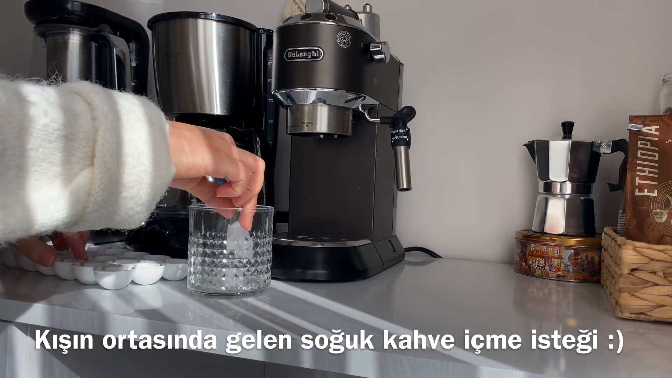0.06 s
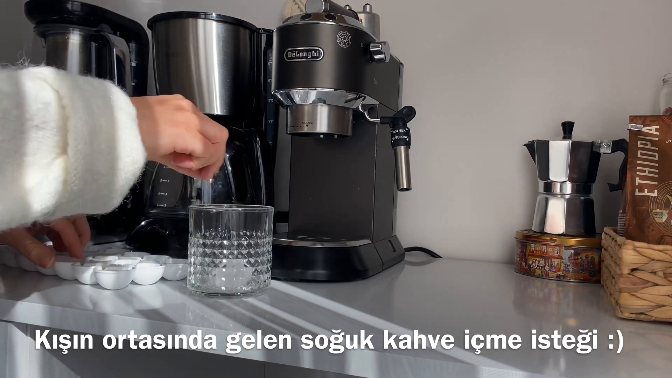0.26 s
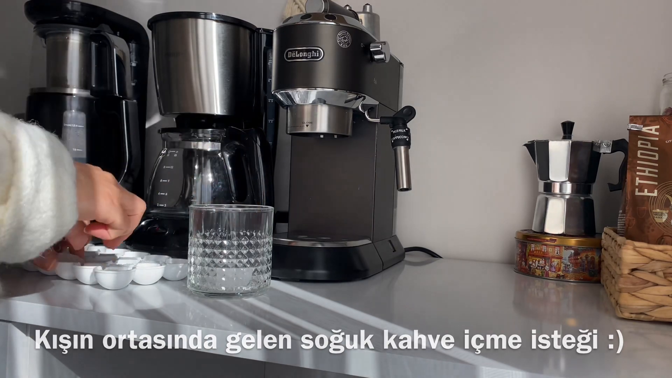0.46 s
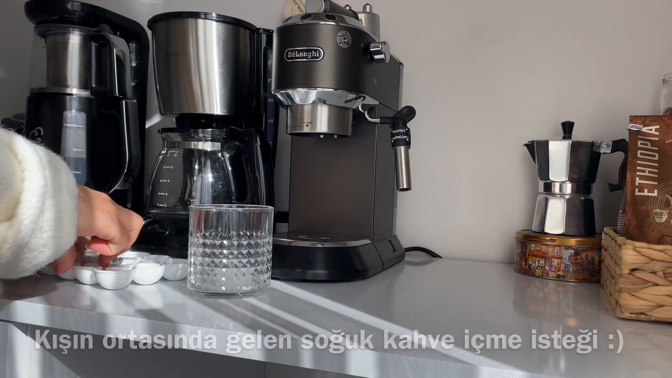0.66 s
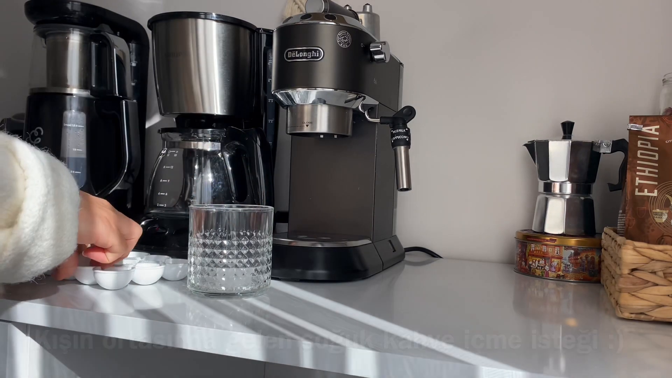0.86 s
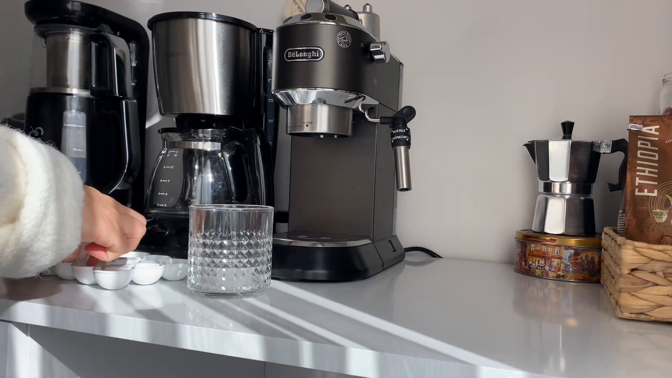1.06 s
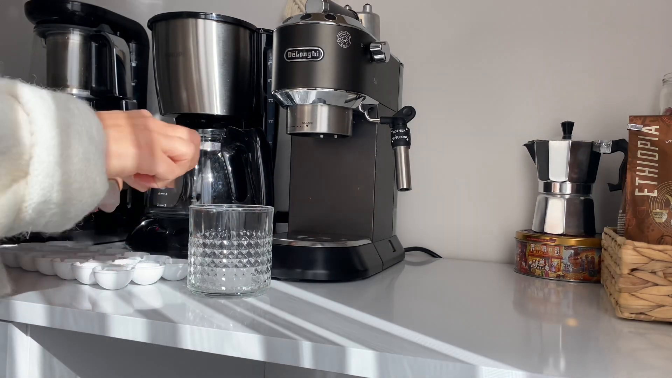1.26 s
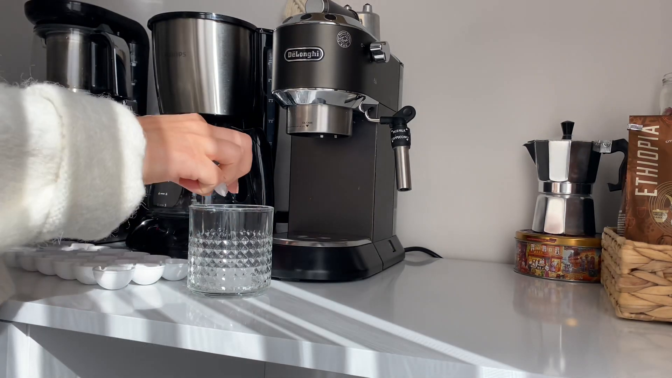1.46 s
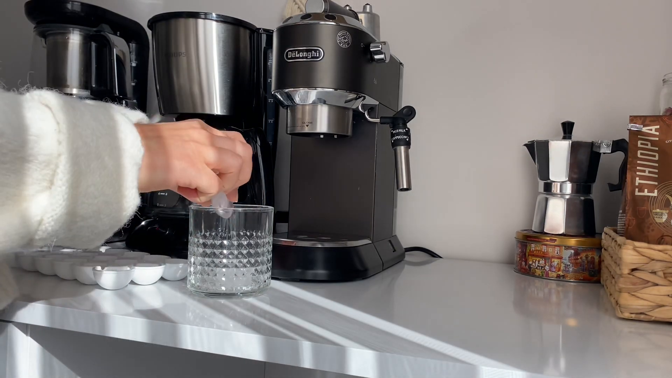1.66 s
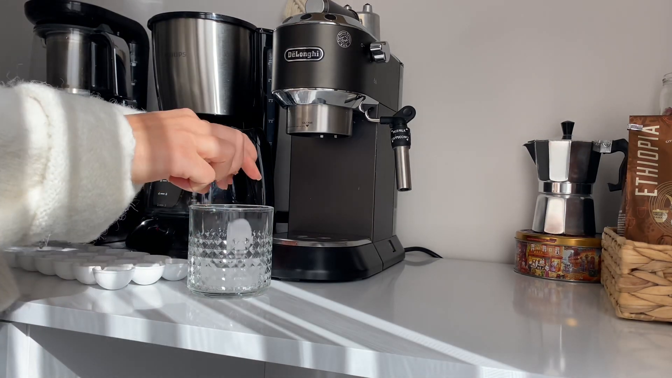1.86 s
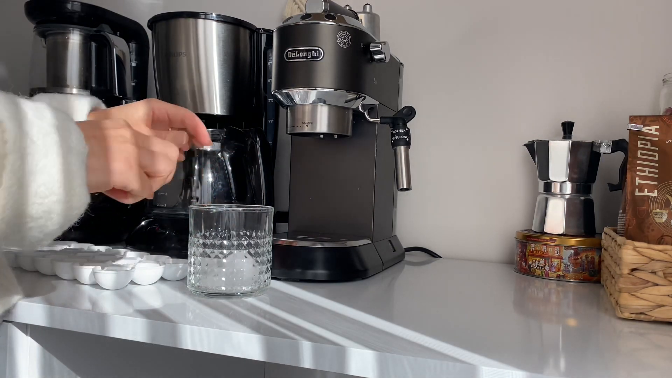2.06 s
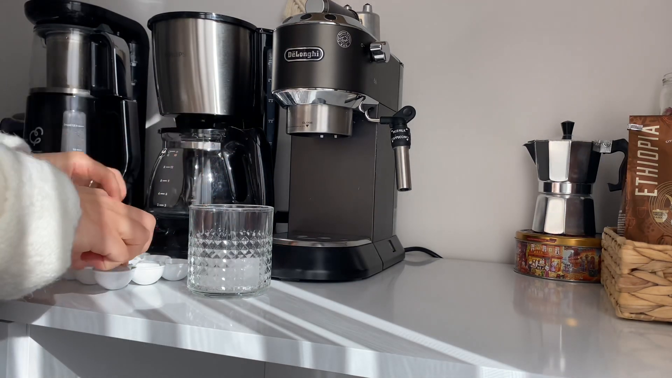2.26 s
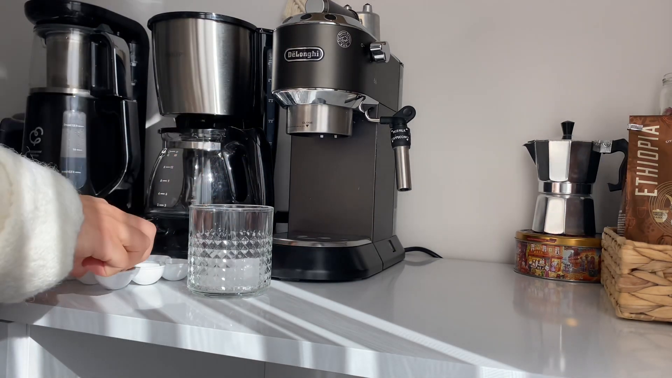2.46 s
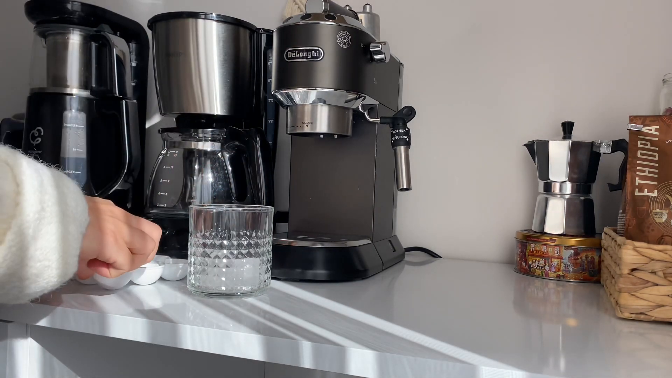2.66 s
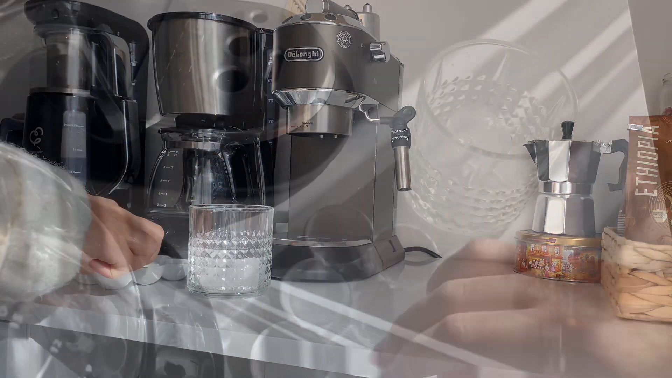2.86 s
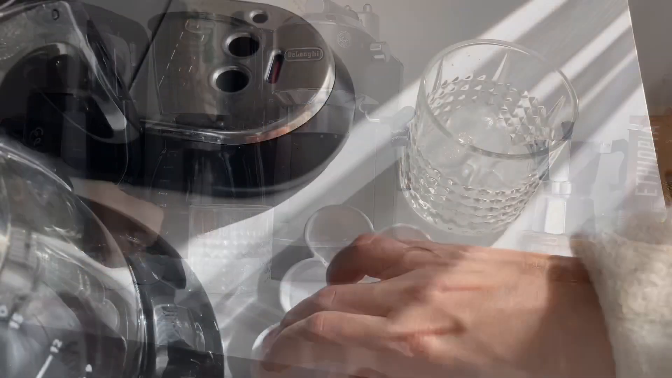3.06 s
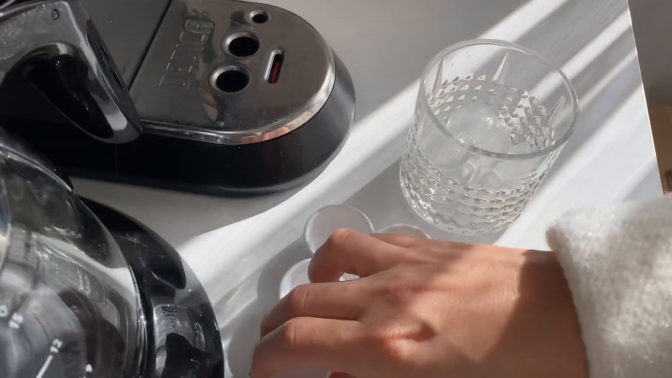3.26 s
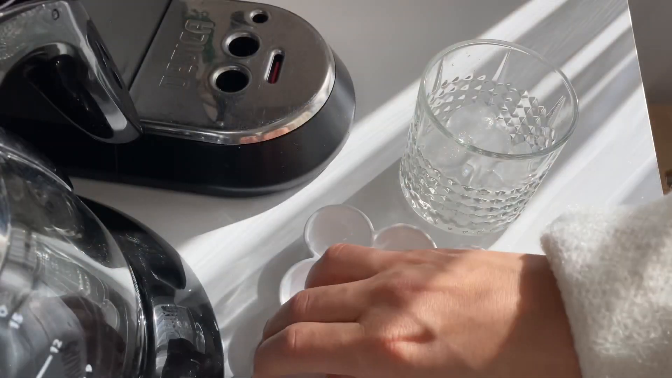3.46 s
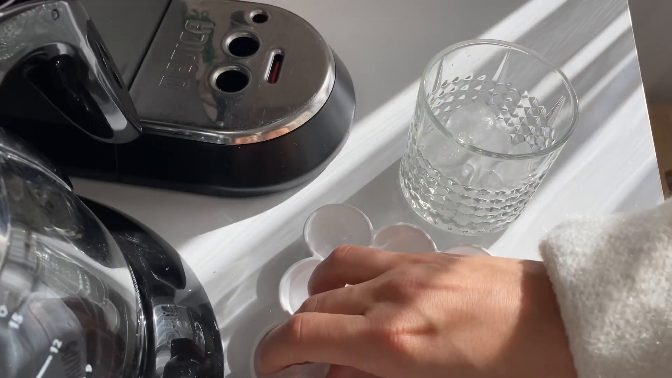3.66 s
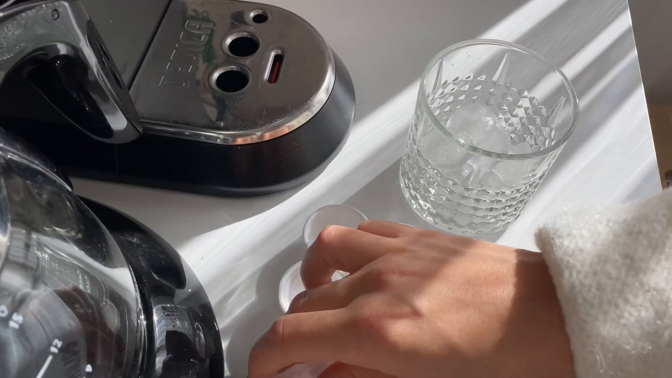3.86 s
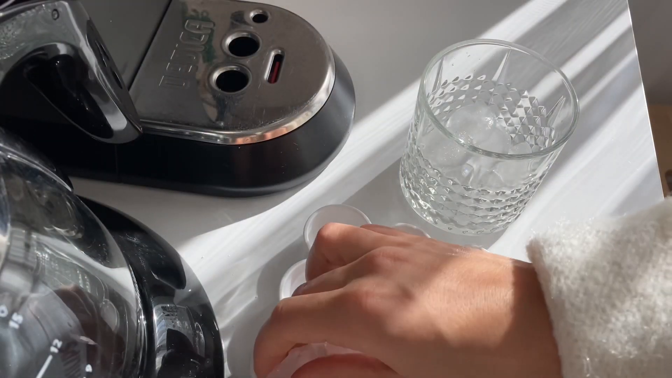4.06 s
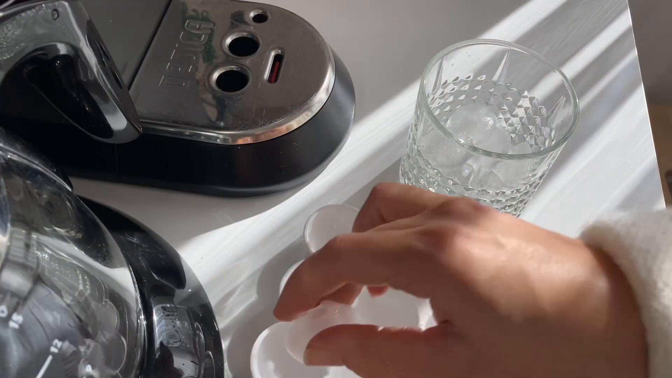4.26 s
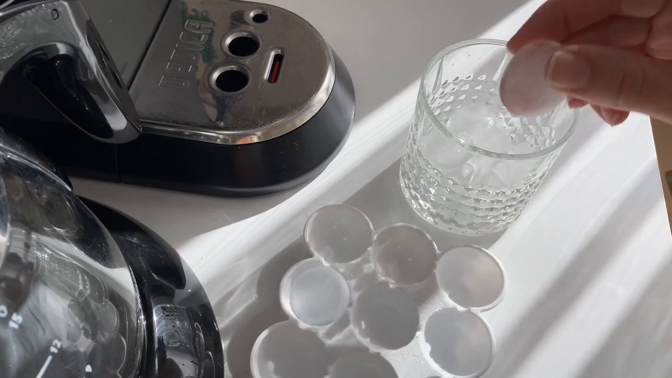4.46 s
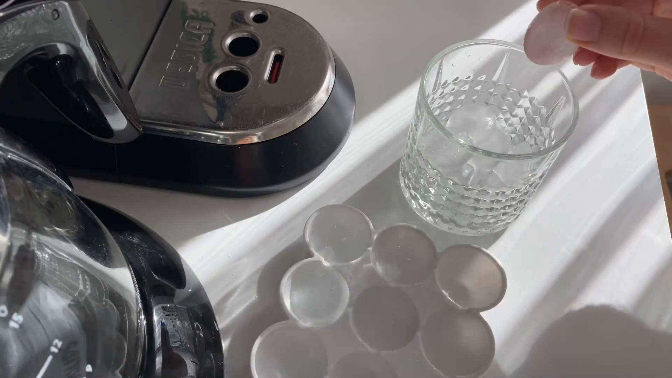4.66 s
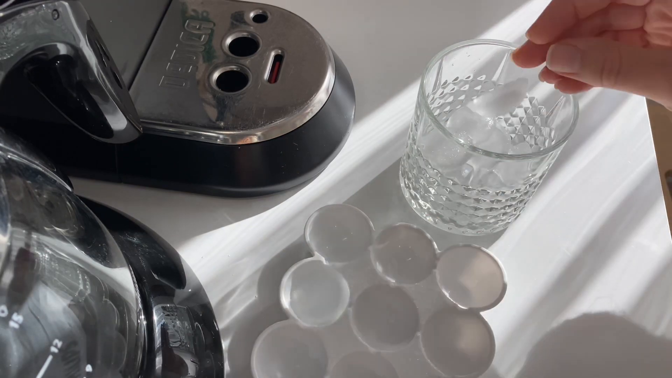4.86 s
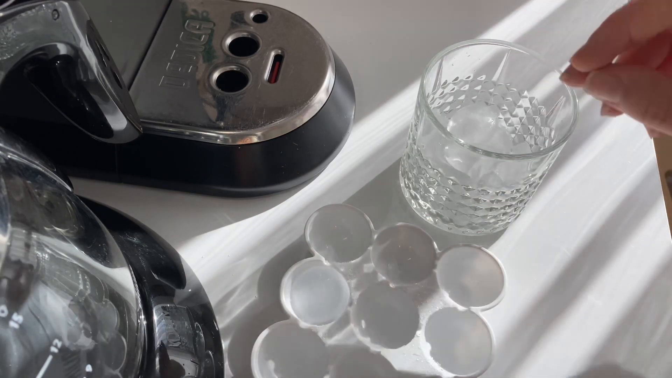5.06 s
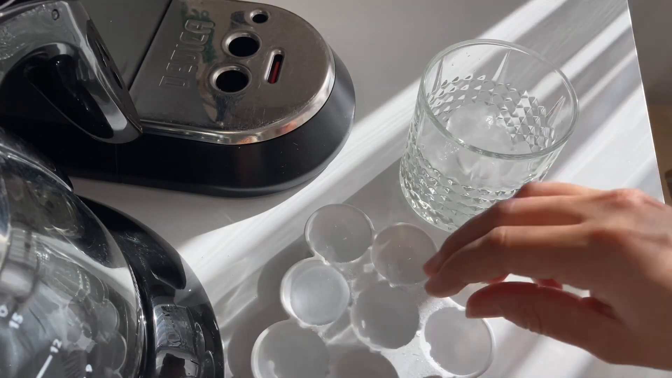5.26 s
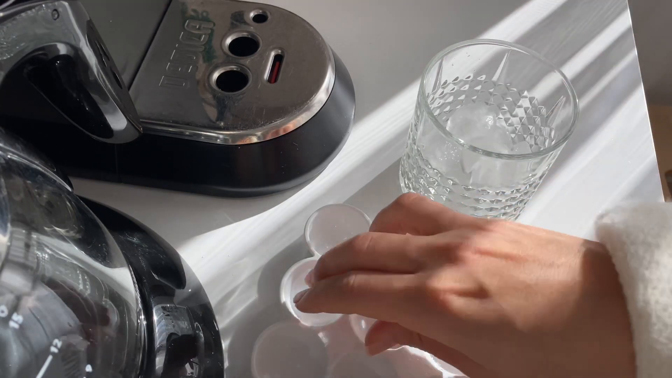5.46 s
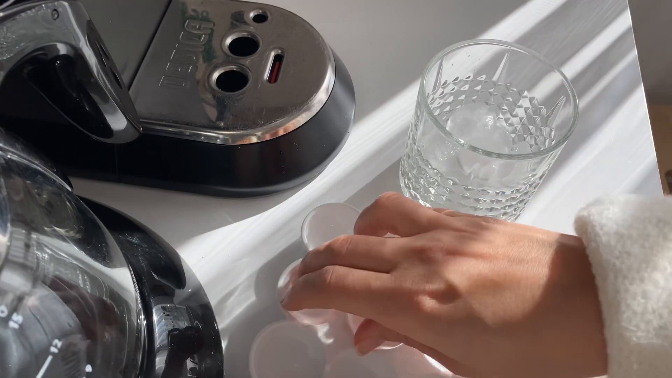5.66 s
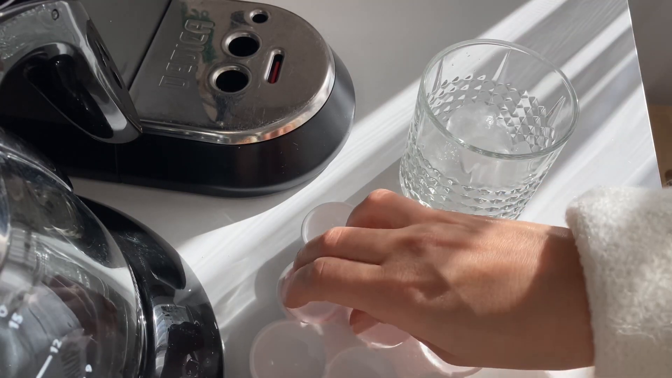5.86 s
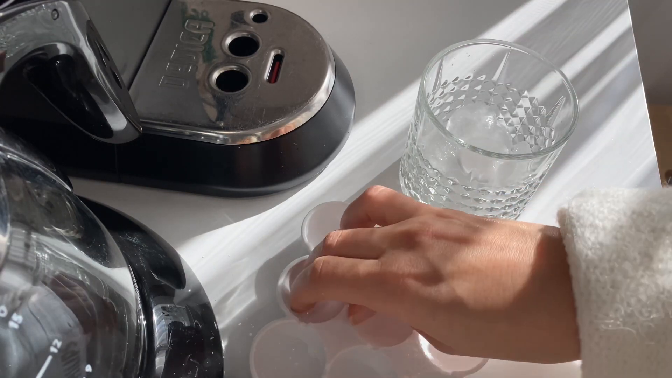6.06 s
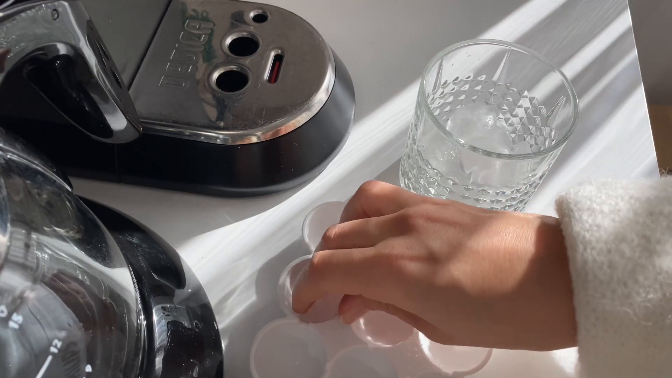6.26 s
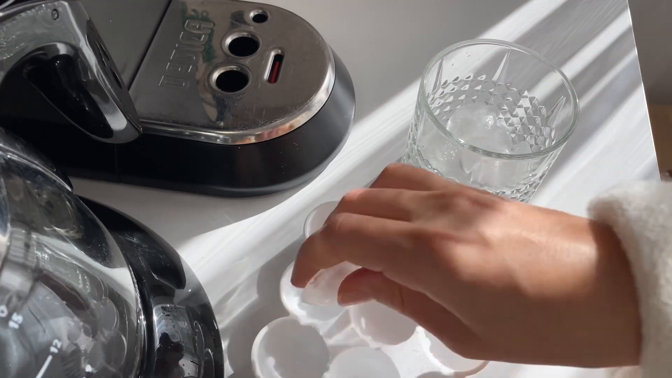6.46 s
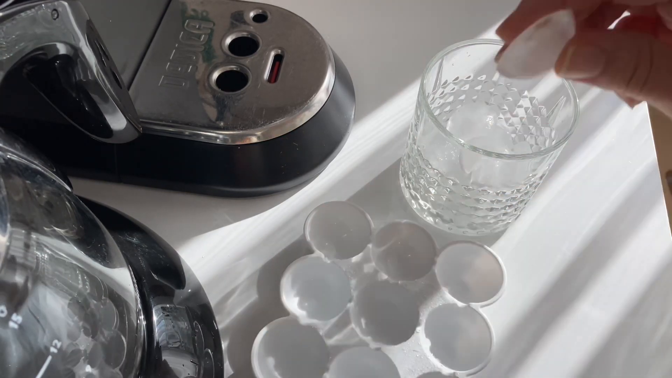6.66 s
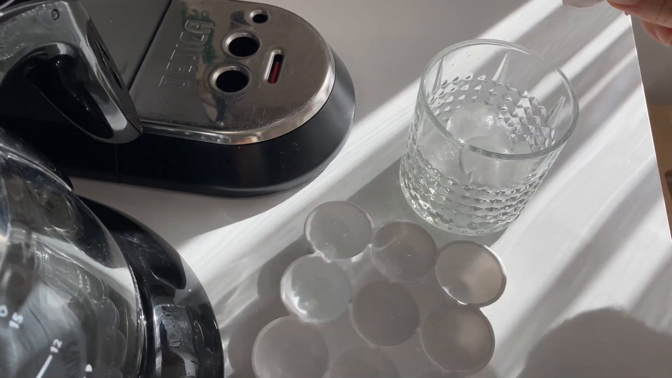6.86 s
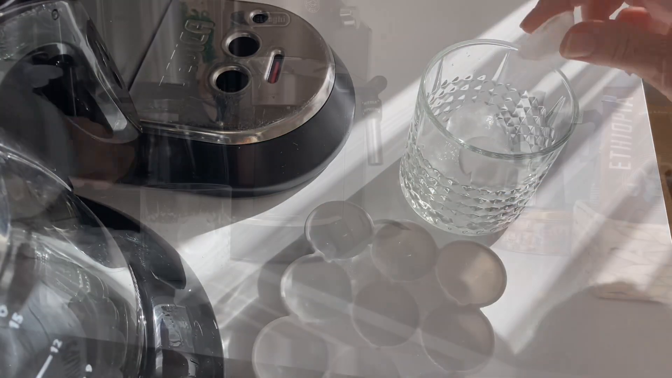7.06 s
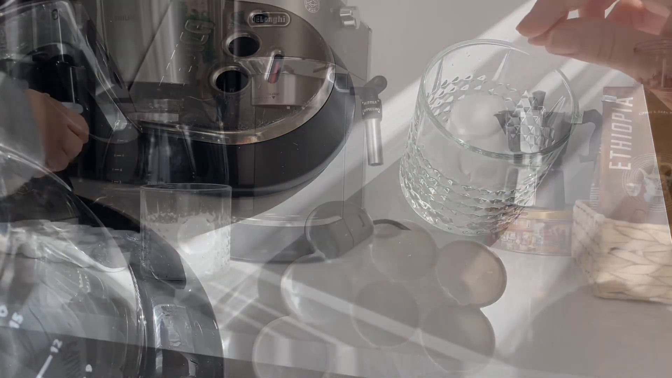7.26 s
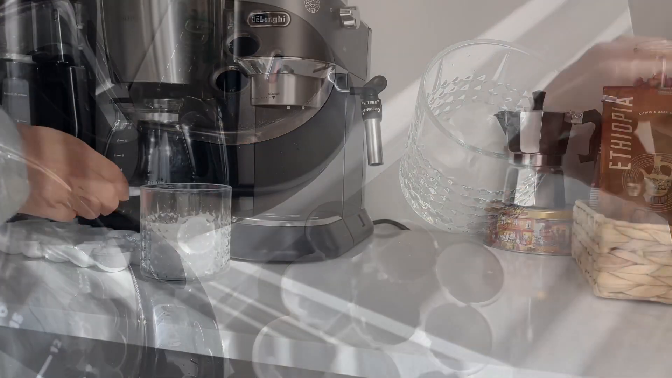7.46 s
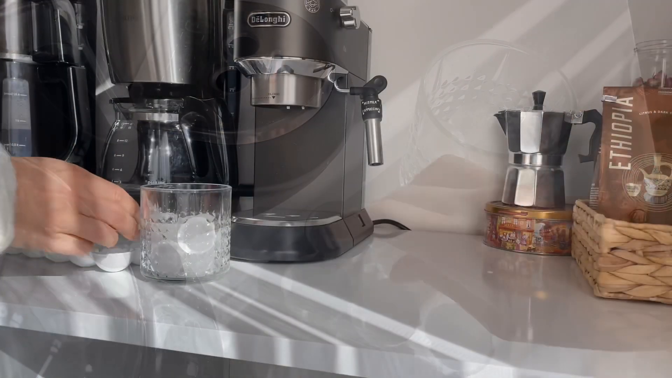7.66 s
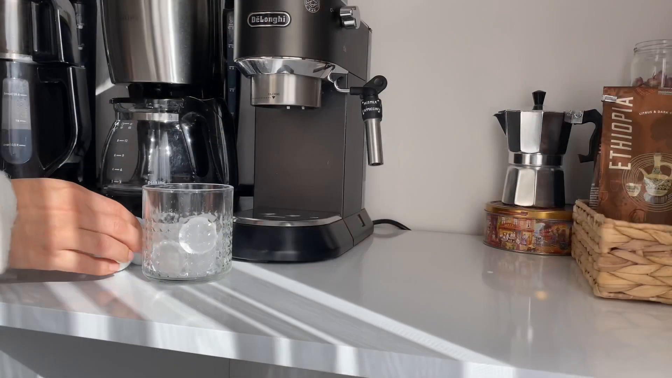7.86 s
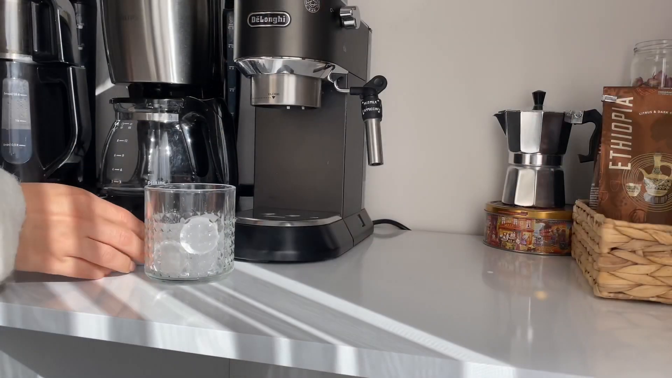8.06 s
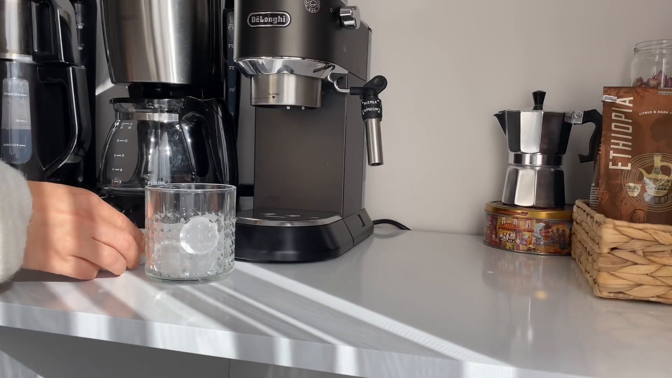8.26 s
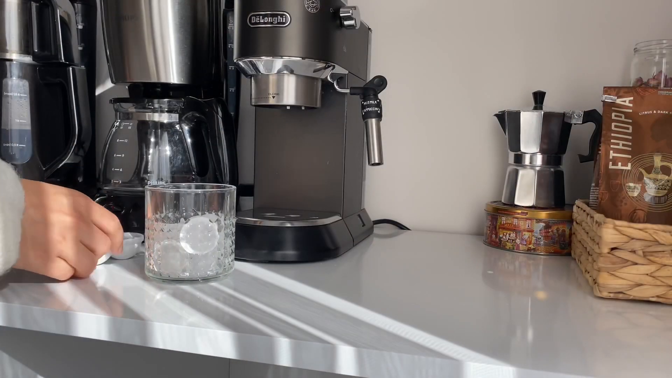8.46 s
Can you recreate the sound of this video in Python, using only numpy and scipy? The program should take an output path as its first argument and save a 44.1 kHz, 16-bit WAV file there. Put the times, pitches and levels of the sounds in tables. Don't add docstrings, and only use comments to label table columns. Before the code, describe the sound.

Ice cubes are pressed from a thin plastic tray and dropped into a thick glass on a counter. Two reverberant clinks are heard from across the room, the second a ringing cluster with a counter thud. Close up, sharp plastic snaps and gritty rubbing alternate with crisp, dry ice drops and a faint cloth brush. The distant view returns with hollow tray crackles over soft room rumble.

```python
import sys
import numpy as np
from scipy import signal
from scipy.fft import rfft, irfft
from scipy.io import wavfile

SR = 44100
rng = np.random.default_rng(int(sys.argv[2]) if len(sys.argv) > 2 else 0)


def put_to_file(sound):
    columns = np.atleast_2d(sound).T
    safe = np.clip(columns, -1, 1)
    whole_steps = np.round(safe * 32767)
    wavfile.write(sys.argv[1], SR, whole_steps.astype(np.int16))


def magnitude_from_level(level_db):
    exponent = np.asarray(level_db, float) / 20
    return 10 ** exponent


N = 375732
HZ = np.maximum(np.fft.rfftfreq(2 ** 19, 1 / SR), 1)

# [t/s, room level/dB, tumbler left over right/dB, upper counter modes level/dB]
DISTANCE = [
    (0.0, 2, 0.8, -2.5),
    (2.7, -1, -0.2, -2),
    (3.1, -12.5, 1, -8),
    (7.5, -12, 0, -18.5),
    (7.8, -1.5, 13, 0.5),
    (8.6, -3, 1, -2.8),
]
# [start t/s, end t/s]
CLOSE_SPAN = (3.0, 7.7)


def at_hz(points, hz):
    points = np.array(points)
    return np.interp(np.log(hz), np.log(points[:, 0] + 1), points[:, 1])


def at_s(rows, s, column):
    rows = np.array(rows)
    return np.interp(s, rows[:, 0], rows[:, column])


def is_close(s):
    return CLOSE_SPAN[0] < s < CLOSE_SPAN[1]


def through(x, response):
    return irfft(rfft(x, 2 ** 19) * response)[..., :N]


def colour(spectrum):
    cepstrum = irfft(at_hz(spectrum, HZ[::128]) * np.log(10) / 20)
    cepstrum[1:2048] *= 2
    cepstrum[2049:] = 0
    pulse = irfft(np.exp(rfft(cepstrum)))
    return rfft(pulse / np.linalg.norm(pulse), 2 ** 19)


def lowpass(x, order, hz):
    return signal.sosfilt(signal.butter(order, hz, fs=SR, output="sos"), x)


def resonances(x, peaks):
    out = 0
    for k, (hz, width, db) in enumerate(peaks):
        r = np.exp(-np.pi * max(width, 5) / SR)
        a = [1, -2 * r * np.cos(2 * np.pi * hz / SR), r * r]
        b = [(1 - r * r) / 2, 0, (r * r - 1) / 2]
        out = out + (-1) ** k * magnitude_from_level(db) * signal.lfilter(b, a, x + 1e-18)
    return out


def add(track, s, sound):
    i = round(s * SR)
    track[..., i:i + sound.shape[-1]] += sound[..., :N - i]


def dying(t60, rise=0.00011):
    t = np.arange(int(.8 * SR)) / SR
    return (1 - np.exp(-t / max(rise, 1e-5))) * magnitude_from_level(-60 * t / max(t60, .002))


def sides(pan_db):
    return magnitude_from_level(np.array([pan_db / 2, -pan_db / 2]))


def stroke(t, start, length):
    u = (t - start) / length
    peak, edge_db = 0.31, -18
    on = np.clip(np.minimum(u, 1 - u) * length / 0.016, 0, 1)
    away = np.maximum(1 - u / peak, (u - peak) / (1 - peak))
    return on * magnitude_from_level(edge_db * np.clip(away, 0, 1))


def uneven_grains(per_s, uneven_db, floor):
    strength = magnitude_from_level(uneven_db * np.minimum(rng.exponential(1, N), 5))
    return strength * (rng.random(N) < per_s / SR) + floor


def struck(modes, levels_db, chance, rise):
    t = np.arange(int(.8 * SR)) / SR
    return sum(magnitude_from_level(db + 2 * z) * dying(t60, rise) * np.sin(2 * np.pi * hz * t + 2 * z)
               for (hz, t60), db, z in zip(modes, levels_db, chance))


def tumbler():
    # [t/s, crack peak level/dB, counter thud level/dB, ring level/dB, sharpness/dB per family]
    far_clinks = [(0.1005, -44, -35.5, -60.5, -1), (0.1115, -5, -23, -39, -13), (0.2838, -34, -43, -58, -3),
                  (0.4174, -29.5, -56.5, -47, -4.5), (1.6937, -33, -39.5, -40, -4),
                  (1.7664, -5.5, -18.5, -50.5, -9.5), (1.806, -15.5, -32.5, -42, -4),
                  (1.8344, -14.5, -44, -37, 13.5), (1.8467, -8, -39, -19, 11),
                  (1.8911, -11, -34.5, -21.5, 5.5), (1.9084, -0.5, -25.5, -19.5, 7),
                  (1.9324, -11.5, -34.5, -20.5, 7), (1.9613, -22, -36, -48.5, 5.5),
                  (1.9774, -24.5, -32, -33.5, -9), (2.156, -10, -33.5, -25.5, 3.5)]
    near_clinks = [(4.9101, -15.5, -21, -33.5, -7.5), (4.9409, -3, -23.5, -39, -4.5),
                   (4.965, -25, -24, -35.5, -6), (5.015, -12, -32, -46, -14),
                   (5.111, -53, -32.5, -53.5, -16.5), (5.131, -27, -33.5, -60, -3),
                   (5.1391, -23, -41, -25, 1.5), (5.22, -49, -43, -58, -10), (7.2648, -7.5, -32, -33.5, 20),
                   (7.2811, -10, -30, -34.5, -3), (7.3399, -15, -31, -24.5, -1.5),
                   (7.346, -15, -34.5, -23.5, 6.5), (7.3738, -15, -52.5, -16, 5.5),
                   (7.538, -45, -47, -50.5, -8.5), (7.5642, -33.5, -62.5, -49.5, -10.5),
                   (7.572, -37.5, -40, -36, -2)]
    # [f/Hz, level/dB per Hz]
    crack_near = [(180, -42), (300, -2.5), (1590, -11), (2120, -7), (2870, -12.5), (3630, -5), (6880, -5),
                  (9160, -7), (11200, -3.5), (15200, -12), (16800, -32)]
    # [f/Hz, level/dB per Hz]
    crack_far = [(180, -27.5), (300, -7), (1100, 0.5), (1600, -7.5), (3340, -12.5), (4830, -9.5),
                 (5620, -5.5), (9320, -15), (11200, -18.5), (13000, -51), (15700, -24.5), (16800, -67.5)]
    near, rasp, far, rings, thuds = np.zeros((5, N))
    hits = far_clinks + near_clinks
    chance, times = rng.standard_normal((len(hits), 29)), np.array(hits)[:, 0]
    for (s, crack_db, thud_db, wall_db, sharp_db), z in zip(hits, chance):
        base_db = thud_db + .5 * at_s(DISTANCE, s, 3)
        if is_close(s):
            base_db -= 15
            add(near, s, magnitude_from_level(crack_db - 1.0) * dying(0.0086))
            add(rasp, s, magnitude_from_level(crack_db - 14) * dying(0.065))
        else:
            add(far, s, magnitude_from_level(crack_db - 9.5) * (dying(0.017, rise=0.00064) + 0.25 * dying(0.064)))
        family_db = [wall_db - sharp_db, wall_db + 3.5, wall_db + sharp_db, base_db]
        add(rings, s, ring(s, times[times > s], crack_db, family_db, z))
        add(thuds, s, thud(s, thud_db, z[15:]))
    tremble = lowpass(rng.standard_normal(N), 2, 45)
    rings *= magnitude_from_level(3.5 * tremble / tremble.std())
    white = rng.standard_normal(N)
    rasp = lowpass(rasp * white, 4, 11000)
    cracks = through(near * white + rasp, colour(crack_near)) + through(far * white, colour(crack_far))
    direct = (rings + thuds + cracks) * sides(at_s(DISTANCE, np.arange(N) / SR, 2))
    return direct, magnitude_from_level(-6.0) * lowpass(rings, 6, 12300) + thuds + lowpass(cracks, 6, 7900)


def ring(s, later_s, crack_db, family_db, chance):
    # [f/Hz, t60/s when empty, family 0 low 1 middle 2 high 3 thick base]
    glass_modes = [(2104, .65, 0), (2117, .4, 0), (2605, .12, 0), (2934, .2, 0), (4878, .36, 1),
                   (4937, .33, 1), (8490, .14, 1), (10840, .17, 2), (10918, .2, 2), (11555, .19, 2),
                   (11590, .17, 2), (13870, .055, 2), (11160, .2, 3), (15300, .13, 3), (15480, .1, 3)]
    ringing_db = [-3, -14.5, -5, -13, -5.5, -2, -9, -6.5, -10.5, -11, -6.5, -5.5, -13.5, -10.5, -15.5]
    # [t/s, share of the empty t60]
    damping = [
        (0.1, 0.9),
        (1.6, 0.72),
        (2.2, 0.76),
        (4.9, 0.95),
        (5.14, 0.29),
        (7.26, 0.19),
        (7.6, 0.18),
    ]
    smother_db = [-4.5, -3.5]
    modes = [(hz, t60 * at_s(damping, s, 1)) for hz, t60, _ in glass_modes]
    lowered_db = np.maximum(crack_db - np.array(family_db) - 23, 0) * [1, 1, 1, 0]
    levels_db = [db + (family_db - lowered_db)[f] for (_, _, f), db in zip(glass_modes, ringing_db)]
    low = struck(modes[:4], levels_db[:4], chance[:4], rise=0.0012)
    rest = struck(modes[4:], levels_db[4:], chance[4:], rise=0.00022)
    t = np.arange(len(low)) / SR + s
    touched = sum(np.clip((t - u) / .002, 0, 1) for u in later_s[:8])
    return low * magnitude_from_level(smother_db[0] * touched) + rest * magnitude_from_level(smother_db[1] * touched)


def thud(s, db, chance):
    # [f/Hz, level/dB, t60/s]
    slab = [(82.7, -8, 0.16), (124.3, -7, 0.25), (158, -6.5, 0.32), (204.5, 0.5, 0.11), (265, -4, 0.064),
            (357.4, -11.5, 0.15), (419.4, -8, 0.19), (491, -12, 0.11), (654, -5, 0.24), (840, -11, 0.051),
            (974.5, 1, 0.21), (980, 0, 0.18), (1167.6, -7, 0.18), (1400, -3.5, .06)]
    upper_db = at_s(DISTANCE, s, 3)
    levels_db = [db - 4.5 + level + (hz > 550) * upper_db for hz, level, _ in slab]
    modes = [(hz, min(t60, 50 / hz)) for hz, _, t60 in slab]
    return struck(modes, levels_db, chance, rise=0.0054)


def rolling():
    # [start t/s, length/s,
    # level/dB]
    rolls = [(0.087, 0.04, -58.5), (0.11, 0.27, -36.5), (1.77, 0.14, -33.5), (1.855, 0.19, -31),
             (2.0, 0.24, -43.5), (2.164, 0.3, -48), (4.894, 0.053, -35.5), (4.908, 0.2, -38),
             (5.03, 0.23, -44), (5.145, 0.2, -49.5), (7.243, 0.046, -57), (7.263, 0.15, -40.5),
             (7.367, 0.6, -59.5)]
    # [f/Hz, level/dB per Hz]
    patter = [(250, -27), (500, -3), (1000, 5.7), (1400, -8), (2600, -7.5), (4500, -12), (7500, -26.5),
              (9200, -25.5), (11500, -25.5), (13000, -41.5)]
    t = np.arange(N) / SR
    press = sum(magnitude_from_level(db) * stroke(t, start, length) for start, length, db in rolls)
    ticks = uneven_grains(per_s=5000, uneven_db=2.0, floor=0.078)
    mid, side = rng.standard_normal((2, N))
    grains = mid + 0.17 * side * [[1], [-1]]
    return through(press * ticks / ticks.std() * grains, colour(patter))


def tray():
    # [f/Hz, width/Hz, level/dB]
    cup_modes = [(628, 540, -10), (824, 260, 0), (1090, 320, 4), (1260, 300, 5), (1530, 340, 4),
                 (2000, 550, 0), (2650, 800, -3), (3550, 1100, -9), (4560, 4600, -20.5)]
    # [f/Hz, level/dB per Hz]
    snap_colour = [(2060, -9), (3500, -6.5), (5500, -12.5), (7850, -12.5), (8950, -16), (10500, -8.5),
                   (13100, -8.5), (15300, -1.5), (16300, -14.5), (16800, -25)]
    # [start t/s, length/s, body level/dB, snap level/dB]
    rubs = [(0.515, 0.34, -65, -50.5), (0.648, 0.3, -50.5, -48.5), (0.896, 0.21, -59, -53.5),
            (2.37, 0.29, -49.5, -65), (2.668, 0.13, -62, -45), (2.847, 0.28, -70, -70),
            (3.304, 0.21, -56, -61), (3.66, 0.2, -38, -58), (3.855, 0.3, -41.5, -47),
            (5.745, 0.43, -70, -58.5), (6.08, 0.17, -56, -71), (6.176, 0.18, -47.5, -47),
            (7.797, 0.25, -56, -62.5), (7.93, 0.32, -34.5, -59), (8.263, 0.4, -47, -58.5)]
    # [t/s, body peak level/dB, snap level/dB, counter thud level/dB, brightness/dB per octave]
    far_pops = [(0.408, -42, -50, -39, 8), (0.527, -57, -57, -61, -4), (0.543, -37.5, -36.5, -28.5, 11),
                (0.618, -39, -62, -60, -4), (0.63, -63, -45.5, -46, 0.1), (0.702, -51, -42.5, -36.5, 4),
                (0.837, -37.5, -42.5, -54, 3.7), (2.418, -67.5, -49, -41, 0.1),
                (2.445, -61, -43.5, -46, 0.1), (2.47, -57, -38.5, -47.5, 3), (2.542, -39, -44, -44, -8.5),
                (2.643, -56, -48, -73, 4), (2.74, -29, -42.5, -45.5, 6), (7.815, -46, -48.5, -42, -14),
                (7.966, -25.5, -48.5, -35.5, 5.7), (7.999, -27.5, -40, -35, 3),
                (8.036, -38, -43, -36.5, -1), (8.075, -38, -45, -39, -3), (8.1, -17.5, -38.5, -26, -5),
                (8.119, -33, -68.5, -35, -3), (8.245, -41, -74, -42.5, -17), (8.281, -27.5, -47, -33.5, -2),
                (8.386, -44, -60, -52, -11), (8.403, -21, -38.5, -31.5, -7),
                (8.427, -29, -56.5, -36.5, 5.5)]
    close_pops = [(3.103, -37, -47.5, -49.5, -3), (3.395, -41.5, -45, -57, -18),
                  (3.428, -40, -66, -41, -11), (3.505, -47, -48, -47.5, 3), (3.516, -15, -29.5, -57, 0.2),
                  (3.52, -10, -18, -25, -0.5), (3.528, -10, -19.5, -43, 6), (3.551, -20, -33, -29, -5),
                  (3.575, -16.5, -39.5, -49, -0.5), (3.586, -35, -47, -29, 13),
                  (3.688, -66, -57.5, -39, -4), (3.724, -31, -53, -36, -2.5), (3.755, -28.5, -37, -48, -6),
                  (3.781, -30, -44, -51, 4), (3.798, -30, -54.5, -55, -3), (3.878, -32.5, -47, -39.5, -12),
                  (3.89, -20.5, -36, -21, 3.5), (3.946, -39, -64, -50, -6), (3.978, -32, -46, -37, -7),
                  (4.066, -50, -52, -43, 6), (4.071, -29.5, -51.5, -64.5, -5.5), (4.0795, -23, -60, -65, 2),
                  (4.106, -39.5, -65, -53, -20), (4.131, -34.5, -54, -53, -7.3),
                  (5.519, -33, -64, -50.5, -1.5), (5.536, -23.5, -38.5, -26.5, -2),
                   (5.644, -34, -55.5, -47, 1.8), (5.708, -35.5, -48.5, -45, 1.3),
                   (5.833, -40.5, -51.5, -49, 2), (5.87, -34.5, -69, -60.5, -4.5),
                   (5.913, -30, -44.5, -53, 0.5), (5.919, -21, -33, -48, 1),
                   (5.929, -30.5, -52, -42.5, -1.5), (5.95, -24, -43, -39, -1),
                   (5.964, -43, -51, -60.5, 0.1), (5.992, -13, -27, -23.5, 0.5),
                   (5.9955, 1.5, -27.5, -36.5, 6), (6.004, -7, -22.5, -30.5, -2.5),
                   (6.173, -36.5, -54, -55, 3.5), (6.219, -58.5, -53.5, -45.5, 1),
                   (6.277, -25, -40.5, -43, 1.5), (6.3, -32.5, -74, -43, -4),
                   (6.365, -41.5, -51, -54.5, -12)]
    cups, (snap, thuds) = np.zeros((len(cup_modes), 2, N)), np.zeros((2, 2, N))
    noise, short = rng.standard_normal((2, N)), int(.2 * SR)
    octaves = np.log2(np.array(cup_modes)[:, :1, None] / 1400)
    pops = far_pops + close_pops
    chances = rng.standard_normal((len(pops), 25))
    for (s, body_db, snap_db, thud_db, bright_db), (long, aside, *z) in zip(pops, chances):
        z, t60 = np.array(z), 0.013 * np.exp(0.15 * long)
        pan_db = (3.5 if is_close(s) else 0.5) + 2.0 * aside
        side, i = sides(pan_db)[:, None], round(s * SR)
        burst = dying(t60, rise=0.0029)[:short] * np.resize(noise[0, i:], short)
        burst[60:72] += magnitude_from_level(8) * np.hanning(12)
        uneven_db = 2.5 * z[14:, None, None]
        add(cups, s, magnitude_from_level(body_db + 1.5 + bright_db * octaves + uneven_db) * side * burst)
        rasp = dying(4.6 * t60 * magnitude_from_level(0.2 * (snap_db + 33.5)))
        add(snap, s, side * magnitude_from_level(snap_db - 1.5) * (rasp + magnitude_from_level(1) * dying(.005)))
        add(thuds, s, thud(s, thud_db - 5.0, z))
    t = np.arange(N) / SR
    grit = uneven_grains(per_s=5000, uneven_db=0.9, floor=0.16)
    knots_db = 4 * rng.standard_normal((len(cup_modes), int(30 * N / SR) + 2))
    slips_db = np.array([np.interp(30 * t, np.arange(len(k)), k) for k in knots_db])
    pressure = np.array([stroke(t, start, length) for start, length, _, _ in rubs]) * grit
    rub_body_db, rub_snap_db = np.array(rubs)[:, 2:].T
    cups += magnitude_from_level(rub_body_db) @ pressure * magnitude_from_level(8.0 + slips_db[:, None]) * noise[0]
    snap += magnitude_from_level(rub_snap_db - 4.5) @ pressure
    body = 0
    for kick, (hz, width, db) in zip(cups, cup_modes):
        once = resonances(kick, [(hz, width, db)])
        body = body + resonances(once, [(hz, width, 0)])
    return body + through(snap * noise[1], colour(snap_colour)) + thuds


def sleeve():
    # [f/Hz, level/dB per Hz]
    cloth = [(530, -46.5), (900, -4), (1040, -2.5), (1440, -17), (4970, -20.5), (9190, -34), (11200, -29),
             (13000, -54)]
    t = np.arange(N) / SR - 6.945
    level_db = -62.5 + np.minimum(268.5 * t, -99 * t)
    return magnitude_from_level(level_db + 9.0) * through(rng.standard_normal((2, N)), colour(cloth))


def kitchen(x):
    # [f/Hz, t60/s, level/dB]
    walls = [(85, 0.91, -3.5), (157, 0.33, 4.5), (320, 0.71, 3.5), (683.5, 0.67, 2.5), (1260, 0.45, 2.5),
             (2760, 0.34, 1.5), (5260, 0.29, 1), (10910, 0.49, -7)]
    likeness = [.95, .93, .6, .05, .2, .05, .15, .4]
    t = np.arange(SR) / SR
    tail = 0
    for (hz, t60, db), alike, white in zip(walls, likeness, rng.standard_normal((len(walls), 2, SR))):
        edges = [hz / 2 ** .5, min(hz * 2 ** .5, 19000)]
        mid, side = signal.sosfilt(signal.butter(2, edges, "band", fs=SR, output="sos"), white)
        ears = np.sqrt(1 + alike) * mid + np.sqrt(1 - alike) * side * [[1], [-1]]
        tail = tail + ears * magnitude_from_level(db - 60 * t / t60)
    tail *= 1 - np.exp(-(t / 0.0018) ** 2)
    return through(x, rfft(tail / 40, 2 ** 19))


def hum():
    # [f/Hz, level/dB per Hz]
    rumble = [(12, -53), (20, -50), (48, 5.5), (210, -9.5), (337, -4), (459, -17), (527, -10.5), (642, -17),
              (698, -12), (1290, -28), (1570, -32), (2140, -39), (3530, -40), (3950, -43.5), (12000, -62),
              (16000, -74)]
    # [f/Hz, width/Hz, level/dB]
    appliance = [(328.7, 15, -64), (3550, 21, -92.5)]
    # [f/Hz, share 0-1]
    likeness = [(30, .95), (60, .92), (130, .8), (290, .68), (640, .1), (1400, .2), (3100, 0), (15000, .2)]
    mid, side, tone = rng.standard_normal((3, N))
    alike = np.clip(at_hz(likeness, HZ), 0, 1)
    shape = magnitude_from_level(at_hz(rumble, HZ))
    shape *= magnitude_from_level(-53.5) / np.sqrt(np.mean(shape ** 2))
    mid = through(mid, shape * np.sqrt(1 + alike))
    side = through(side, shape * np.sqrt(1 - alike))
    tones = 0
    for hz, width, db in appliance:
        tones = tones + magnitude_from_level(db) * np.sqrt(SR / np.pi / width) * resonances(tone, [(hz, width, 0)])
    return (mid + side * [[1], [-1]]) / np.sqrt(2) + tones


def scene():
    # [f/Hz, left lead/radians]
    ports = [(0, 0), (250, .15), (450, 1.3), (700, 1.9), (1400, 1.3), (2800, 1.8), (5600, 1.5), (9500, .9),
             (12000, 1.6), (14000, 2.1), (16500, 2.2)]
    (glass, glass_to_walls), plastic = tumbler(), tray()
    lead = np.exp(.5j * np.interp(HZ, *np.transpose(ports)) * [[1], [-1]])
    room_gain = magnitude_from_level(at_s(DISTANCE, np.arange(N) / SR, 1))
    wet = kitchen((glass_to_walls + plastic.mean(axis=0)) * room_gain)
    return through(glass + plastic + rolling(), lead) + wet + sleeve() + hum()


def top_cut(x):
    return signal.sosfilt(signal.butter(12, 16980, fs=SR, output="sos"), x)


def record(dry):
    # [f/Hz, width/Hz, depth 0-1]
    dips = [(9200, 1300, .98), (13200, 1500, .96)]
    for hz, width, depth in dips:
        dry = dry - depth * resonances(dry, [(hz, width, 0)])
    rounded = .95 * np.tanh(dry / .95)
    return top_cut(lowpass(rounded, 12, 16050))


dry = scene()
out = record(dry)
put_to_file(out)
```